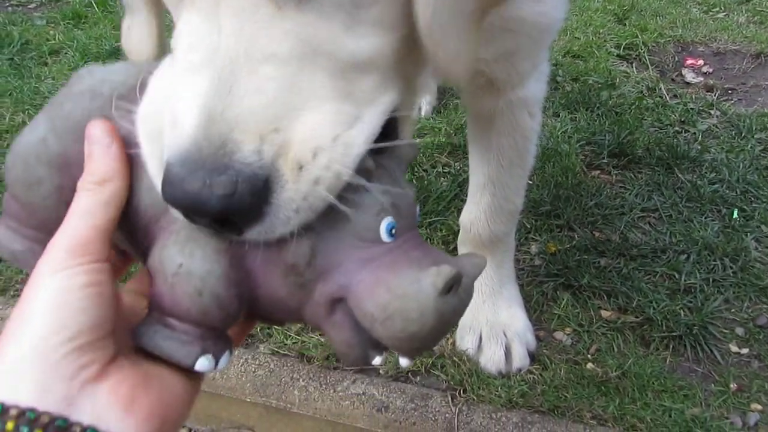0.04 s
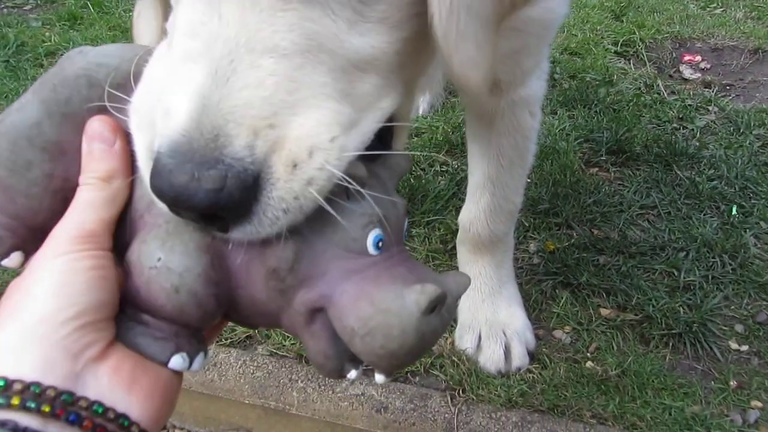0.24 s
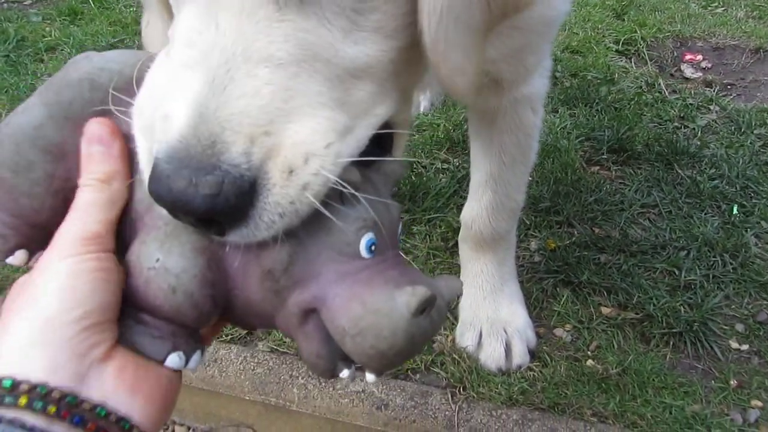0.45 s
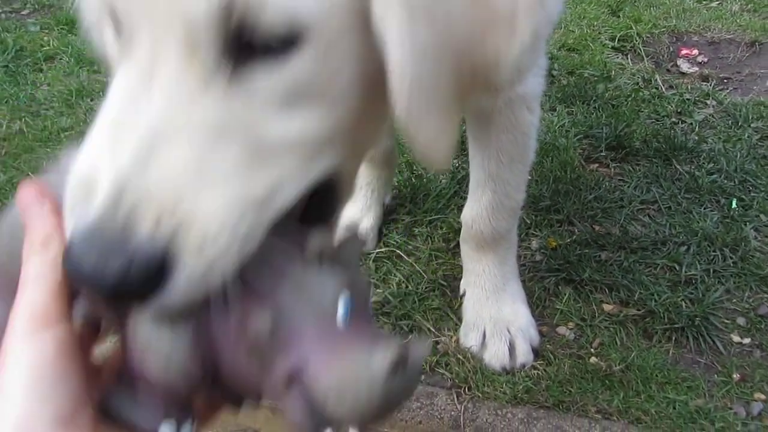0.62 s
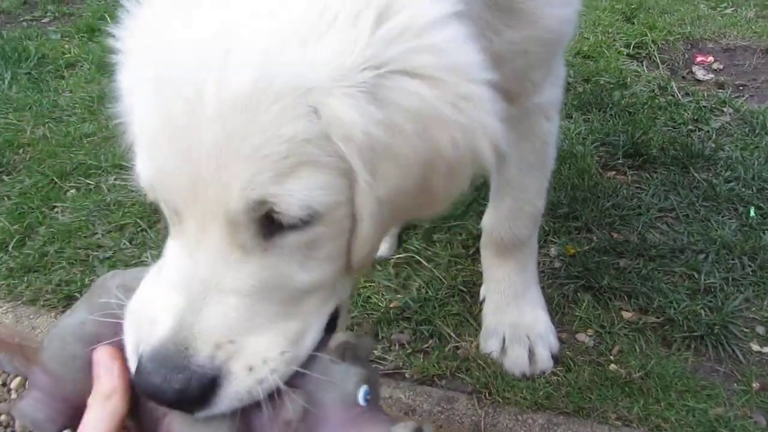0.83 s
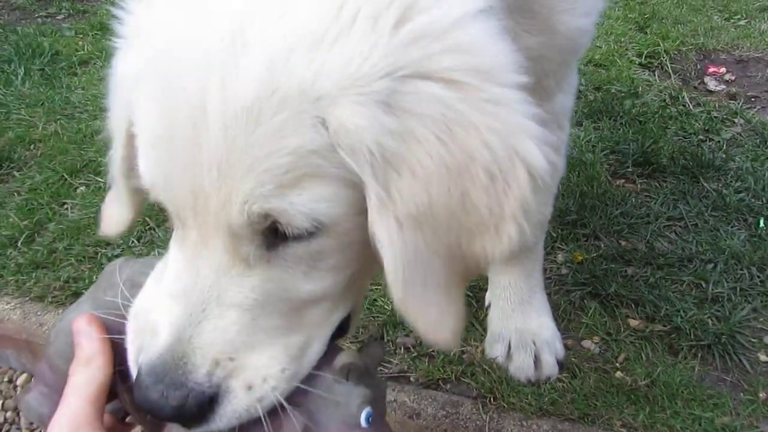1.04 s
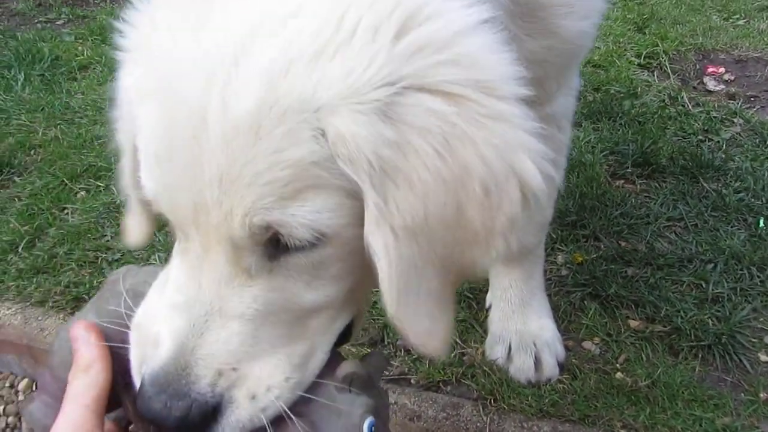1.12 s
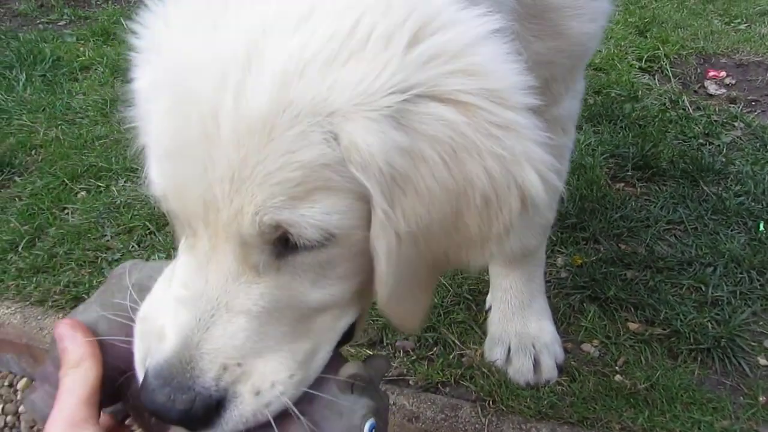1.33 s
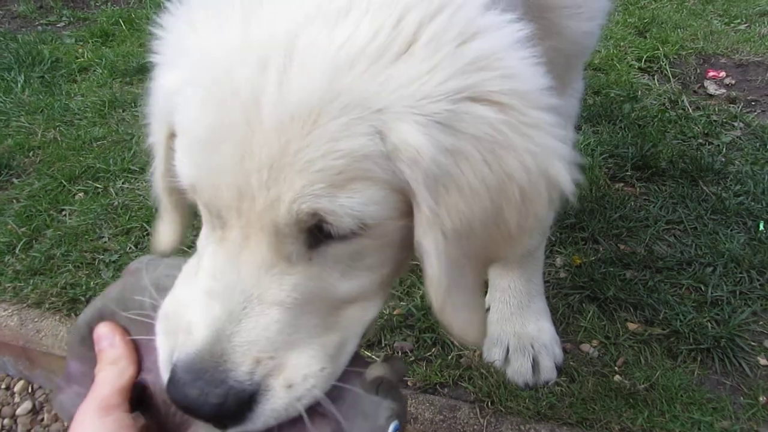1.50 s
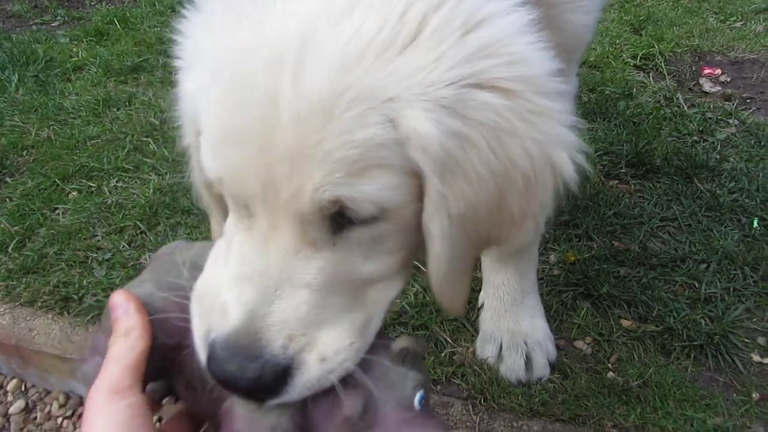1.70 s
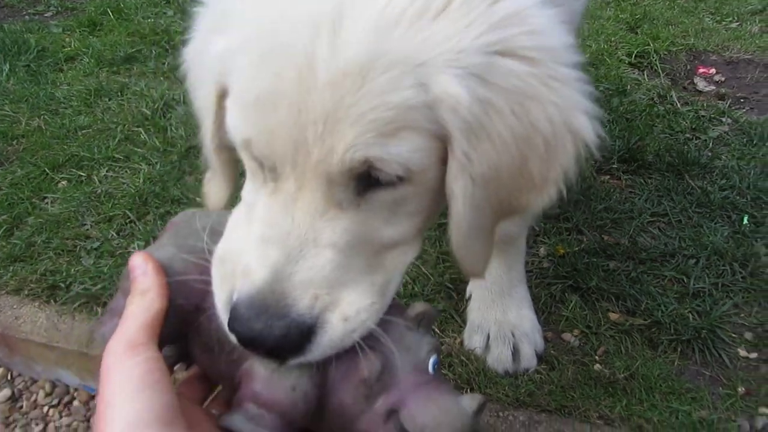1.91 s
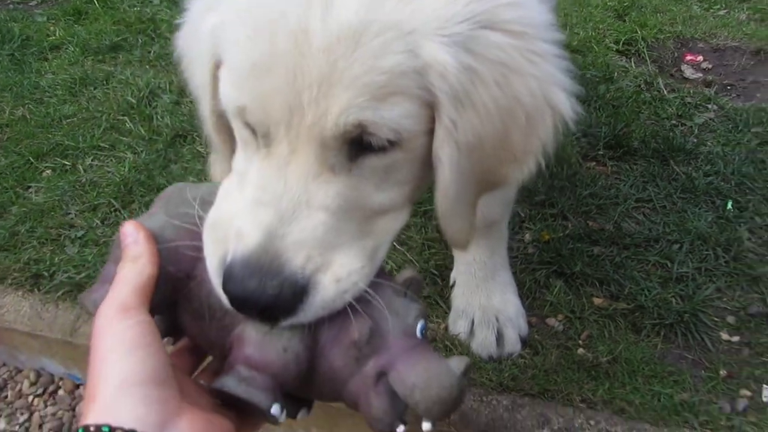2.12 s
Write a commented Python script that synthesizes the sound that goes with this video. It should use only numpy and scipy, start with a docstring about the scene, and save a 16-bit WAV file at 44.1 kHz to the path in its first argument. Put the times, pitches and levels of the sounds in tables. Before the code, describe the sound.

Four short, raspy honks from a dog biting a rubber toy in a quiet garden.

```python
"""A dog's squeaky toy

A rubber toy is squeezed four times, close by, as a dog chews it in a quiet garden. Its reed, a small
flap in the airflow, slaps shut about 70-120 times a second. Each slap rings the hollow body, dented
differently by every grip. Air hisses back in between squeezes, over a low distant hum, soft
handling and garden air."""
import sys
import numpy as np
from scipy import signal
from scipy.fft import rfft, irfft
from scipy.io import wavfile

SR = 44100
rng = np.random.default_rng(int(sys.argv[2]) if len(sys.argv) > 2 else 0)


def log_audio(samples):
    """Write samples as a 16-bit WAV file to the path given in sys.argv[1]."""
    # one column per channel
    frames = np.atleast_2d(samples).T
    # limit to full scale, then quantise
    limited = np.clip(frames, -1, 1)
    pcm = np.round(limited * 32767).astype(np.int16)
    wavfile.write(sys.argv[1], SR, pcm)


N = 94815

# The tone of the garden air: pitch_hz, relative_level_db
AIR_TONE = [(25, -26.5), (50, -17.5), (92, -9.5), (123, -6.5), (195, -14.5), (600, -20.5), (1480, -30.5),
            (3700, -45.5), (6000, -47), (9000, -53.5), (12500, -68.5), (16000, -65.5)]
# How loud the air and the hum are over time: time_s, level_db
AIR_LEVEL = [(0, -45), (.5, -52.5), (1.0, -50.5), (1.35, -51), (1.7, -55), (2.15, -53)]
HUM_LEVEL = [(0, -42.5), (.25, -48), (.55, -48), (.9, -43.5), (1.15, -55), (1.45, -57.5), (1.7, -62.5),
             (2.15, -77)]
# Jaws and fingers on the rubber: peak_s, half_length_s, pitch_hz, level_db
RUBS = [(.02, 0.09, 90, -43.5), (0.115, 0.021, 100, -39.5), (.03, 0.045, 710, -50), (.04, .09, 3500, -68.5),
        (.658, 0.004, 620, -51.5), (.659, .005, 1900, -64.5), (.54, 0.045, 1400, -57)]
# The course of each squeeze: time_s, slap_rate_hz, body_db, treble_db
SQUEEZE_1 = [(0.1003, 80.5, -5.9, -18.6), (0.1122, 89.1, 9.4, -8.8), (0.1226, 99.6, 10.8, -7.1),
             (0.1418, 110.9, 7.0, 5.0), (0.1679, 117.9, 8.8, -2.3), (0.2045, 100.6, 1.2, 0.9),
             (0.227, 78.1, -1.1, -16.6), (0.2428, 77.0, -4.0, -18.3)]
SQUEEZE_2 = [(0.3114, 88.2, -14.7, -28.6), (0.3222, 99.8, -1.6, -20.6), (0.3412, 109.7, 4.3, 1.3),
             (0.3684, 110.6, 3.9, 3.0), (0.3878, 92.3, 2.4, -5.0), (0.4148, 75.3, -1.0, -16.0)]
SQUEEZE_3 = [(0.6947, 81.5, -18.4, -29.7), (0.7063, 91.6, -3.5, -18.7), (0.7374, 100.8, 3.6, 1.2),
             (0.7782, 95.3, 1.8, -2.8), (0.8115, 84.2, 1.4, -6.7), (0.8479, 81.6, -2.8, -10.3),
             (0.8733, 74.7, -4.7, -15.8), (0.8905, 66.8, -18.9, -32.0)]
SQUEEZE_4 = [(1.3866, 82.9, -18.3, -29.2), (1.398, 94.6, -2.4, -15.8), (1.4171, 115.3, 6.4, 1.5),
             (1.4506, 121.9, 7.6, -1.1), (1.4763, 111.0, 5.3, -1.1), (1.486, 102.9, -0.2, -0.9),
             (1.496, 90.9, -1.5, -4.0), (1.5235, 71.9, -5.6, -19.5)]
# The pitches at which the toy rings in each grip: pitch_hz, width_hz, relative_level_db
GRIP_1 = [(182, 108, -16), (557, 560, -17), (1176, 600, -12), (1818, 175, 0.5), (2296, 630, -8.5),
          (3180, 740, -20), (4530, 480, -14.5), (4970, 350, -15.5), (5590, 400, -10.5), (6140, 560, -19.5)]
GRIP_2 = [(197, 100, -11.5), (540, 860, -11.5), (1204, 620, -9.5), (1834, 180, 1.5), (2355, 510, -4),
          (3200, 600, -18), (4580, 520, -4.5), (5147, 380, -7.5), (5673, 650, -2), (6000, 350, -15)]
GRIP_3 = [(172, 100, -10), (750, 392, -8), (1258, 920, -5.5), (1992, 400, 2), (2470, 220, -2.5),
          (3126, 420, -8), (4460, 380, 0.5), (5055, 450, -7.5), (5600, 520, -1.5), (6370, 550, -14)]
GRIP_3_SLIPPED = [(160.2, 122, -2.5), (755, 740, -7.5), (1630, 490, -1), (2100, 270, 1), (2460, 370, -1),
                  (3202, 300, -4), (4590, 460, -5.5), (5430, 290, -6.5), (5930, 300, -12), (6900, 200, -19)]
GRIP_4 = [(195, 150, -2.5), (700, 420, -5), (1647, 1100, 1), (2180, 260, 2), (2487, 220, -2.5),
          (3254, 290, -8), (4674, 420, -3), (5504, 420, -0.5), (6030, 400, -3.5), (7000, 190, -14.5)]
# The four honks; notches are pitches that the dented body weakens:
# squeeze, first_grip, last_grip, treble_lag_s, left_over_right_db, level_db, reed_db, notches_hz
HONKS = [(SQUEEZE_1, GRIP_1, GRIP_1, 0.00041, -1, -0.77, -15.5, (1560, 2900, 3200)),
         (SQUEEZE_2, GRIP_2, GRIP_2, 0.000264, -.9, -0.37, -11, (1540, 2950, 2700)),
         (SQUEEZE_3, GRIP_3, GRIP_3_SLIPPED, .0003, 0.62, -0.27, -7.5, (1740, 2800, 3600, 4210)),
         (SQUEEZE_4, GRIP_4, GRIP_4, 0.000999, -.6, -0.26, -4.5, (2920, 3700, 4920))]
# The reed's high overtones: pitch_hz, width_hz, relative_level_db
REED = [(7350, 1800, -21.5), (9580, 760, -24), (10700, 700, -31), (12050, 800, -38.5), (13850, 520, -28.5),
        (15400, 400, -46.5)]
# How much louder the toy is on the left: pitch_hz, left_over_right_db
LEFT_LOUDER = [(150, 1), (700, 0), (1400, -2.5), (2200, -0.5), (4400, -1), (8000, 1.5), (15000, 1.9)]
# How far ahead its wave is at the left microphone: pitch_hz, lead_radians
LEFT_AHEAD = [(2000, 0), (3100, -0.12), (4600, .2), (5500, 1), (7200, 0.53), (9000, 0.57), (15000, .2)]
# Air drawn back in: start_s, end_s, level_db
REFILLS = [(0.246, 0.264, -61), (0.45, 0.496, -55.5), (0.485, 0.607, -50)]
# The pitches at which the air hole rings: pitch_hz, width_hz, relative_level_db
INLET = [(1840, 200, 9.5), (2380, 520, -26), (4370, 450, -29), (5700, 940, -19), (6560, 900, -14),
         (10000, 1300, -29.5), (14000, 600, -37)]

SLAP_SAMPLES, LEAD_SAMPLES = 2048, 128  # room for one slap, and for a fade-in before it
SPLIT_HZ = 3700  # the body rings below this, the treble above
SOFT_HZ = 2400  # only pitches below this sag, and the lowest wander least
DENT_HZ, DENT_DB, TREBLE_DENT_SHARE = 55, 3.5, 0.8  # the ringing wanders as the rubber gives way
SLIP_START_S, SLIP_S = 0.79, 0.04  # the jaws shift during the third squeeze
SLACK_HZ = 92  # a reed slower than this is slack: the body rings lower, later and thinner
SAG_PER_SLACK, LAG_S_PER_SLACK, LOW_CUT_HZ_PER_SLACK = 0.27, 0.00033, 1900
BODY_LAG_S_PER_HZ, TREBLE_LAG_S_PER_HZ = 3.6e-7, 5.5e-7  # higher pitches leave the toy later
RASP_S, BODY_RASP_DB, TREBLE_RASP_DB = 0.0022, -13.5, 8  # air tears through the reed at each slap
RASP_HZ, RASP_APART_HZ = 9150, 13000  # the rasp is mostly very high, where left and right differ


def undb(db):
    """Turn decibels into a number to multiply by."""
    return 10 ** (np.asarray(db) / 20)


def unit(x):
    """Scale a signal to an average strength (rms) of 1."""
    return x / np.sqrt(np.mean(np.abs(x) ** 2))


def left_right(db):
    """Two gains that make the left side db louder than the right."""
    return undb(np.array([[db], [-db]]) / 2)


def curve(rows):
    """Join (time_s, level_db) points into a gain for every sample."""
    return undb(np.interp(np.arange(N) / SR, *np.array(rows).T))


def by_pitch(rows, f):
    """Join (pitch_hz, value) points, giving every octave equal room."""
    hz, value = np.array(rows).T
    return np.interp(np.log(f + 1), np.log(hz), value)


def peak(f, hz, width):
    """A hump of height 1 around one pitch."""
    return 1 / (1 + (2 * (f - hz) / width) ** 2)


def resonances(rows, f):
    """The tone of something that rings at several pitches."""
    return np.sqrt(sum((undb(db) * peak(f, hz, width)) ** 2 for hz, width, db in rows))


def noise(tone):
    """Noise of strength 1 with the given tone."""
    return unit(irfft(rfft(rng.standard_normal(N)) * tone, N))


def drift(rate_hz):
    """A slow random wobble of strength 1."""
    return noise(1 / (1 + (np.fft.rfftfreq(N, 1 / SR) / rate_hz) ** 4))


def garden_air(f, side_db=-2.5):
    """Quiet, dull outdoor air, partly alike on both sides."""
    tone = undb(by_pitch(AIR_TONE, f))
    middle = noise(tone)
    side = undb(side_db) * noise(tone) * np.array([[1], [-1]])
    return (middle + side) * curve(AIR_LEVEL)


def distant_hum(pitch_hz=120.5, waver=0.004, octave_db=-17, unsteady_db=2.5):
    """A low, wavering hum with a weak note one octave up."""
    phase = 2 * np.pi * np.cumsum(pitch_hz * (1 + waver * drift(6.4))) / SR
    level = curve(HUM_LEVEL) * undb(unsteady_db * drift(9.5))
    return level * unit(np.sin(phase) + undb(octave_db) * np.sin(2 * phase))


def rubs(f, t):
    """Jaws and fingers softly bump and scuff the rubber."""
    band = lambda hz: ((f / hz) / (1 + (f / hz) ** 2)) ** 3
    return sum(undb(db) * np.exp(-((t - at) / half_length) ** 2) * noise(band(hz))
               for at, half_length, hz, db in RUBS)


def ring(f, peaks, notches, dent, scatter_db, sag=0, scatter_hz=20, notch_db=-10, notch_width_hz=110):
    """The spectrum of the toy ringing once; its pitches follow the dent and shift a little by chance."""
    chance = rng.standard_normal((len(peaks), 2))
    sagged = lambda hz: hz * (1 - sag * (hz < SOFT_HZ))
    shifted = []
    for (hz, width, db), (pitch_luck, level_luck), (pitch_dent, level_dent) in zip(peaks, chance, dent):
        shift_hz = (scatter_hz * pitch_luck + DENT_HZ * pitch_dent) * min(hz / SOFT_HZ, 1)
        shifted.append((sagged(hz) + shift_hz, width, db + scatter_db * level_luck + DENT_DB * level_dent))
    dips_db = sum(notch_db * peak(f, sagged(hz), notch_width_hz) for hz in notches)
    tone = resonances(shifted, f) * undb(dips_db)
    # Keep this tone, but make all the ringing come after the slap (minimum phase).
    cepstrum = irfft(np.log(unit(tone) + 1e-9))
    cepstrum[1:SLAP_SAMPLES // 2] *= 2
    cepstrum[SLAP_SAMPLES // 2 + 1:] = 0
    return np.exp(rfft(cepstrum))


def slap(f, grip, reed, notches, dent, slack, progress, lag_s):
    """The reed shuts: the body thumps, then the treble rings with a rasp of air. Gives both spectra."""
    delay = lambda seconds: np.exp(-2j * np.pi * np.cumsum(seconds) * f[1])
    age = np.arange(SLAP_SAMPLES) / SR
    puffs = unit(rfft(rng.standard_normal((3, SLAP_SAMPLES)) * age * np.exp(-2 * age / RASP_S)))
    shared_puff, side_puffs = puffs[0], puffs[1:]

    spent = slack * progress  # slack counts for more as the air runs out
    body_peaks = [row for row in grip if row[0] < SPLIT_HZ]
    body = ring(f, body_peaks, notches, dent[0], scatter_db=1.2, sag=SAG_PER_SLACK * spent)
    low_cut = (1j * f / (1j * f + LOW_CUT_HZ_PER_SLACK * spent + 1)) ** 2
    body_lag = np.minimum(f, SPLIT_HZ) * (BODY_LAG_S_PER_HZ + LAG_S_PER_SLACK * slack / SPLIT_HZ)
    body *= low_cut * (delay(body_lag) + undb(BODY_RASP_DB) * shared_puff)

    treble_peaks = [row for row in grip if row[0] >= SPLIT_HZ] + reed
    treble = ring(f, treble_peaks, notches, TREBLE_DENT_SHARE * dent[1], scatter_db=1.1)
    treble_lag = lag_s + TREBLE_LAG_S_PER_HZ * np.clip(f - SPLIT_HZ, 0, SPLIT_HZ)
    rasp_tone = undb(TREBLE_RASP_DB) * f ** 2 / (f ** 2 + RASP_HZ ** 2)
    rasp = rasp_tone * (shared_puff + side_puffs * f / RASP_APART_HZ)
    return unit(body), unit(treble * (delay(treble_lag) + rasp))


def honk(squeeze, first_grip, last_grip, lag_s, reed_db, notches, body_boost_db=0.5):
    """One squeeze drives a quick run of reed slaps; midway the grip may slip."""
    times, rate_hz, body_db, treble_db = np.array(squeeze).T
    f, t = np.fft.rfftfreq(SLAP_SAMPLES, 1 / SR), np.arange(times[0], times[-1], 1 / SR)
    slap_count = np.cumsum(np.interp(t, times, rate_hz)) / SR
    reed = [(hz, width, db + reed_db) for hz, width, db in REED]
    fade = signal.windows.tukey(SLAP_SAMPLES, LEAD_SAMPLES / SLAP_SAMPLES)
    dent_phase = rng.uniform(0, 2 * np.pi, (2, len(first_grip), 2))
    out = np.zeros((2, N + SLAP_SAMPLES))
    for at in np.interp(np.arange(slap_count[-1]), slap_count, t):
        slack = max(1 - np.interp(at, times, rate_hz) / SLACK_HZ, 0)
        progress = (at - t[0]) / (t[-1] - t[0])
        slip = np.clip((at - SLIP_START_S) / SLIP_S, 0, 1)
        grip = (1 - slip) * np.array(first_grip) + slip * np.array(last_grip)
        dent = np.sin(dent_phase + 2 * np.pi * progress)
        body, treble = slap(f, grip, reed, notches, dent, slack, progress, lag_s)
        body *= undb(body_boost_db + np.interp(at, times, body_db))
        treble *= undb(np.interp(at, times, treble_db))
        start = int(at * SR) - LEAD_SAMPLES
        exact_timing = np.exp(-2j * np.pi * f * (at - start / SR))
        out[:, start:start + SLAP_SAMPLES] += fade * irfft((body + treble) * exact_timing)
    return out[:, :N]


def toy(f, low_cut_hz=80, bounce_s=0.0026, bounce_db=-18):
    """The honks reach two microphones, directly and with a bounce off the ground."""
    direct = sum(honk(squeeze, first, last, lag_s, reed_db, notches) * undb(db) * left_right(pan_db)
                 for squeeze, first, last, lag_s, pan_db, db, reed_db, notches in HONKS)
    ground = 1 + undb(bounce_db) * np.exp(-2j * np.pi * f * bounce_s)
    low_cut = (1j * f / (1j * f + low_cut_hz)) ** 2
    left = undb(by_pitch(LEFT_LOUDER, f) / 2) * np.exp(0.5j * by_pitch(LEFT_AHEAD, f))
    return irfft(rfft(direct) * ground * low_cut * np.array([left, 1 / left]), N)


def garden_echo(sound, t):
    """The garden gives a short echo, and fences farther away a fainter, longer one."""
    decay = lambda db, fade_s: undb(db) * unit(undb(-60 * t / fade_s)) / np.sqrt(N)
    garden, fences = decay(db=-13.5, fade_s=0.13), decay(db=-34, fade_s=0.48)
    tail = rng.standard_normal((2, N)) * np.hypot(garden, fences)
    return signal.fftconvolve(sound.mean(0)[None], tail, axes=1)[:, :N]


def refills_and_leak(f, t, fade_s=0.039, flutter_db=2.5):
    """The rubber springs back and sucks in air; while it is held, a thin leak whistles."""
    def gate(start_s, end_s, db):
        return undb(db) * np.clip(np.minimum(t - start_s, end_s - t) / fade_s + 0.5, 0, 1)
    intake = sum(gate(*row) for row in REFILLS) * noise(resonances(INLET, f))
    leak = gate(start_s=1.08, end_s=1.2, db=-77) * noise(peak(f, hz=3550, width=70))
    return (intake + leak) * undb(flutter_db * drift(36))


def scene():
    """The toy and its handling in front of the quiet garden."""
    f, t = np.fft.rfftfreq(N, 1 / SR), np.arange(N) / SR
    background = (distant_hum() + garden_air(f) + rubs(f, t)) * left_right(db=2)
    honks = toy(f)
    return background + honks + garden_echo(honks, t) + refills_and_leak(f, t)


def record(dry, top_hz=16000):
    """The recorder cuts off the very highest pitches."""
    return signal.sosfilt(signal.ellip(8, 0.2, 70, top_hz, fs=SR, output="sos"), dry)


dry = scene()
out = record(dry)
log_audio(out)
```